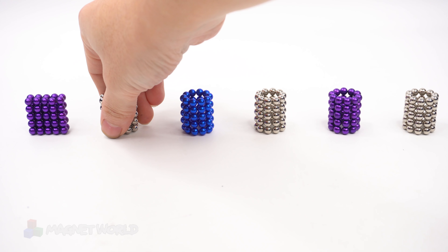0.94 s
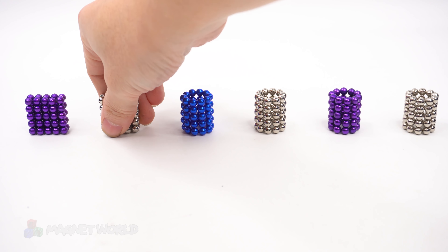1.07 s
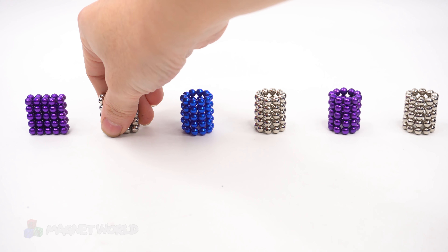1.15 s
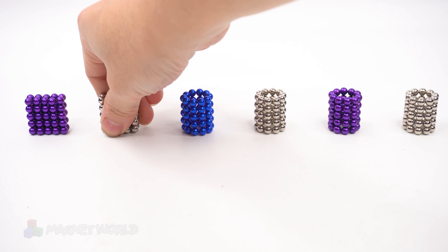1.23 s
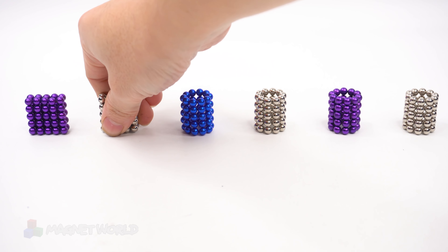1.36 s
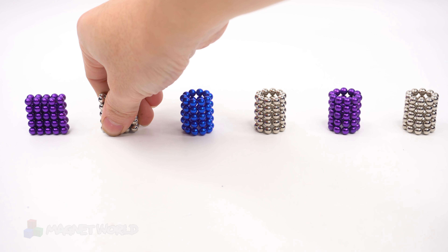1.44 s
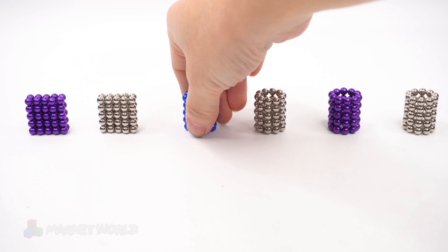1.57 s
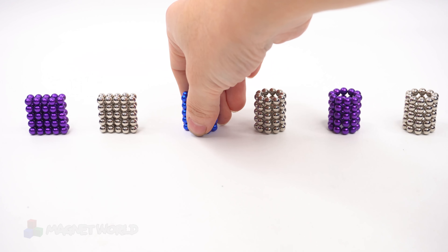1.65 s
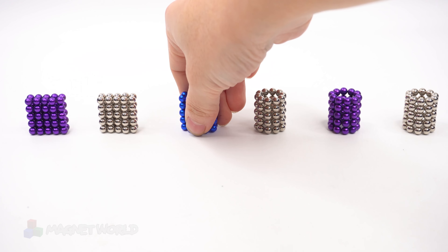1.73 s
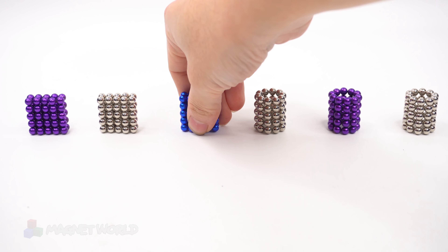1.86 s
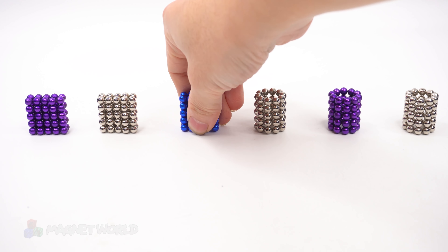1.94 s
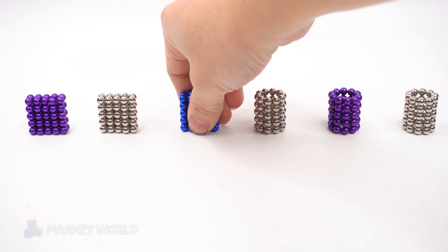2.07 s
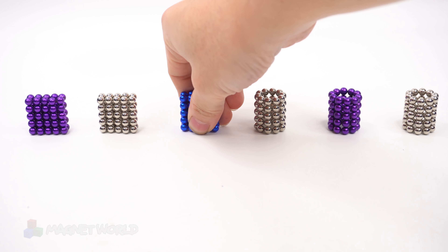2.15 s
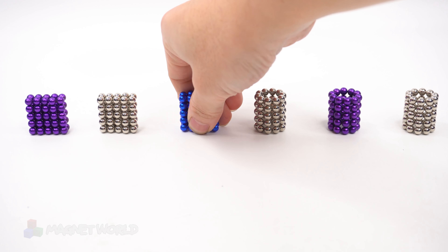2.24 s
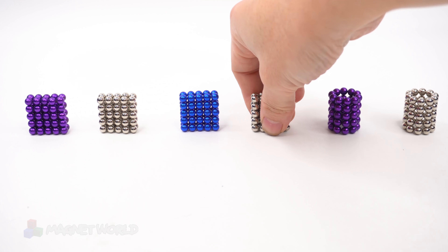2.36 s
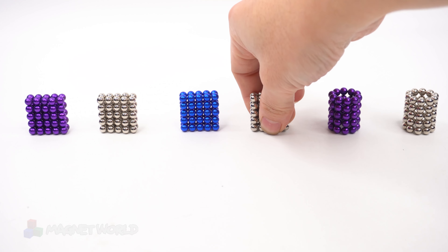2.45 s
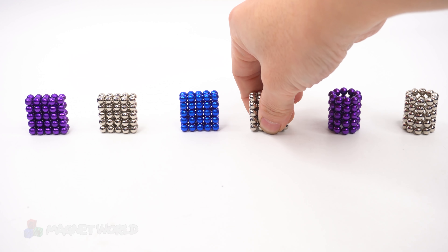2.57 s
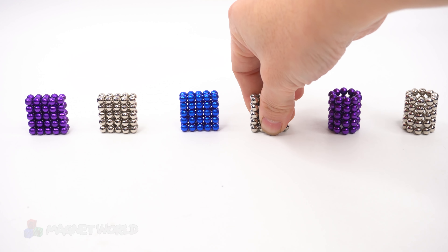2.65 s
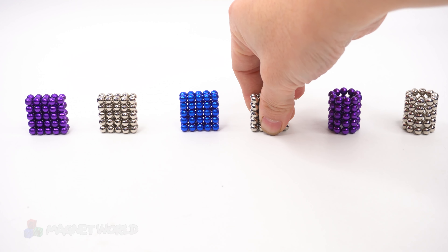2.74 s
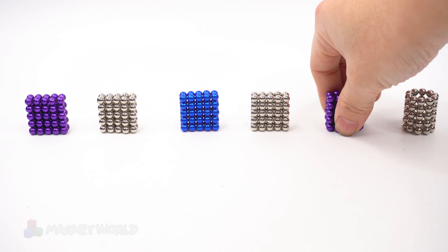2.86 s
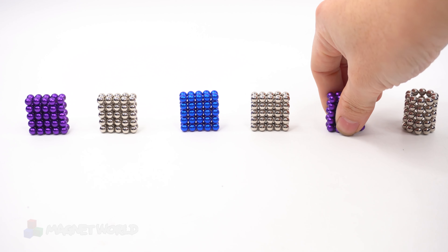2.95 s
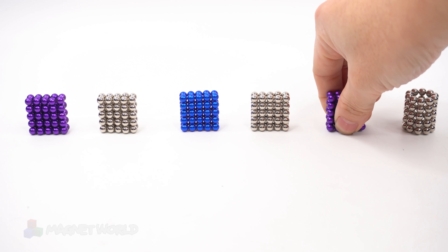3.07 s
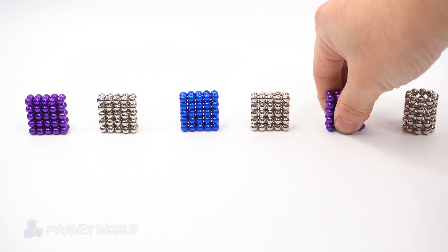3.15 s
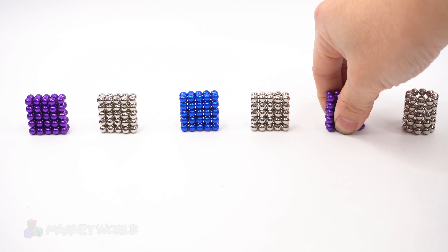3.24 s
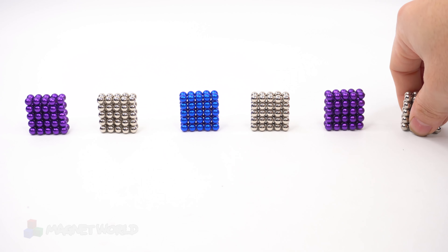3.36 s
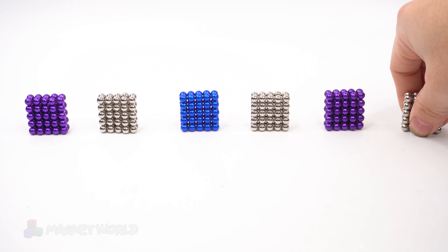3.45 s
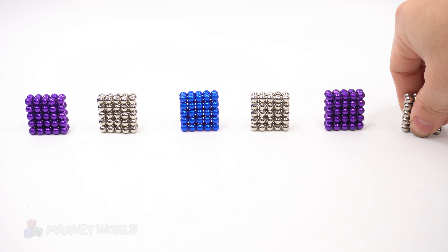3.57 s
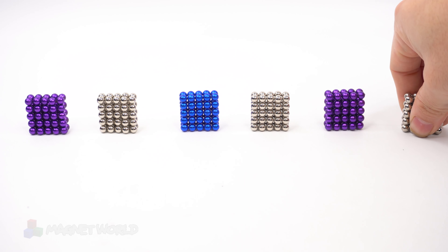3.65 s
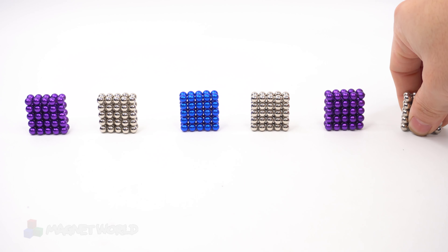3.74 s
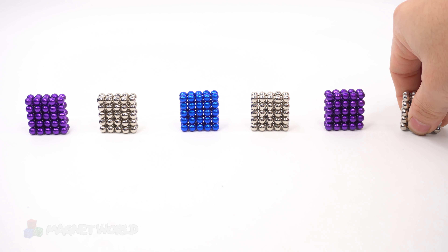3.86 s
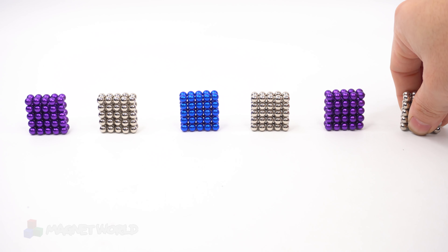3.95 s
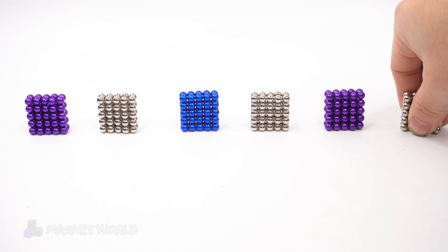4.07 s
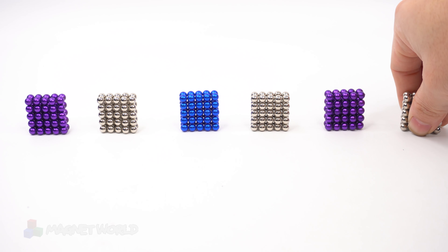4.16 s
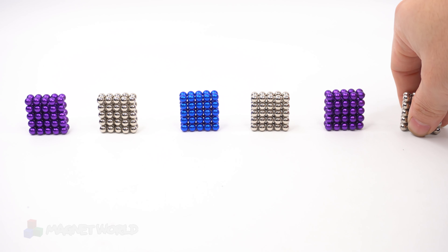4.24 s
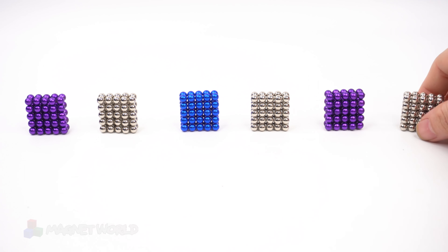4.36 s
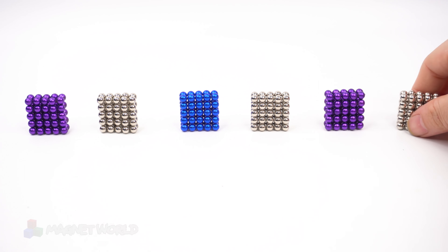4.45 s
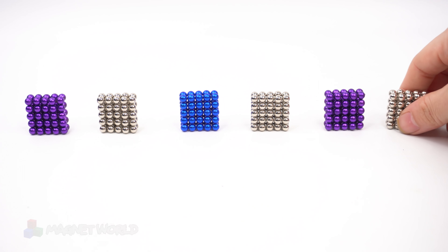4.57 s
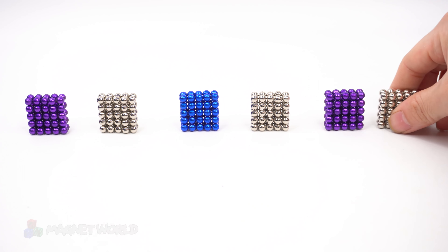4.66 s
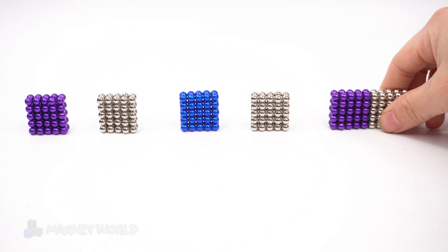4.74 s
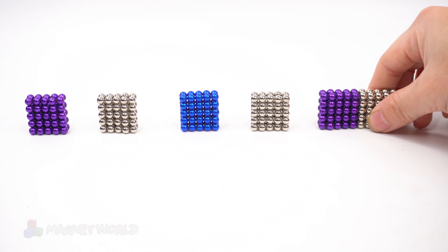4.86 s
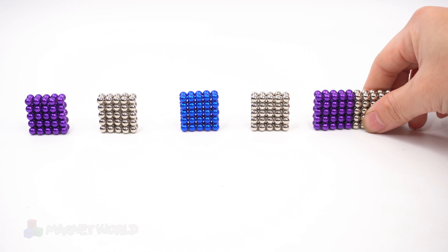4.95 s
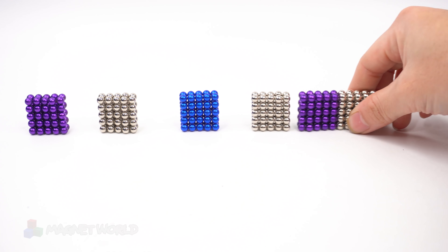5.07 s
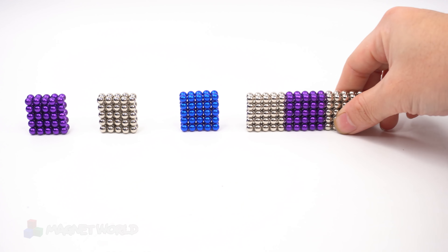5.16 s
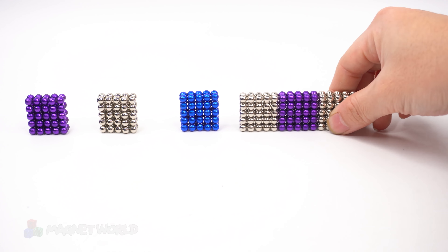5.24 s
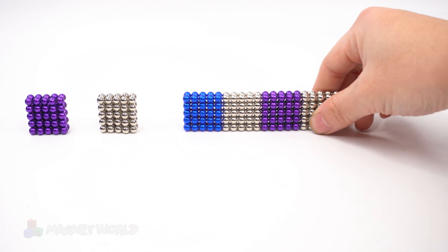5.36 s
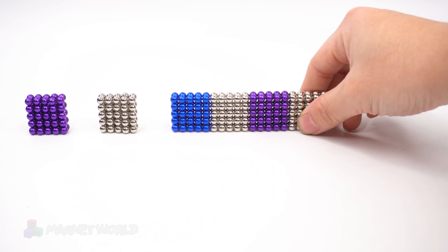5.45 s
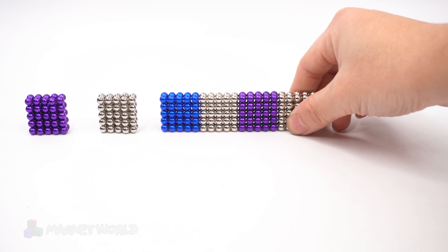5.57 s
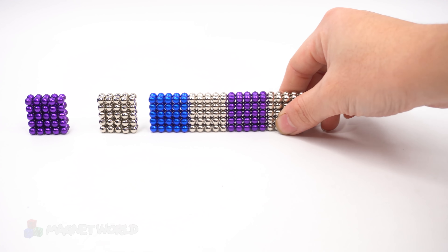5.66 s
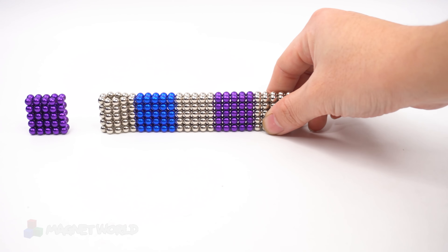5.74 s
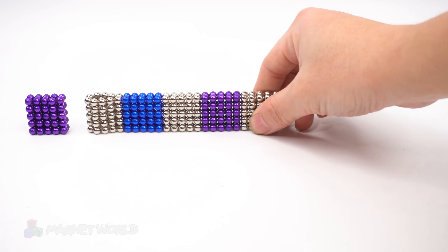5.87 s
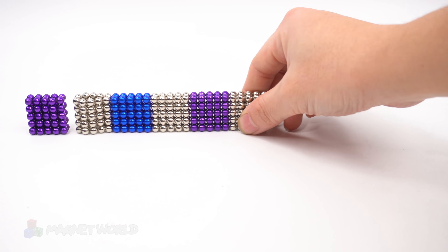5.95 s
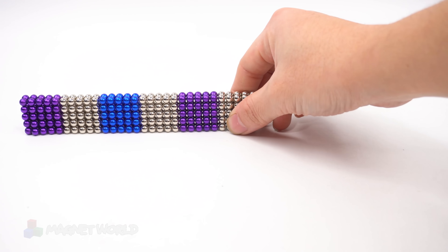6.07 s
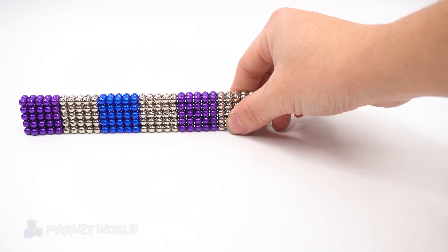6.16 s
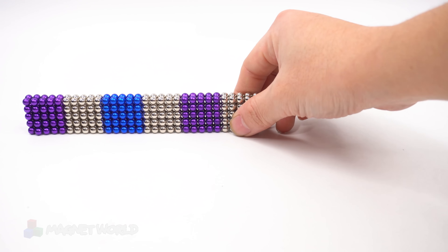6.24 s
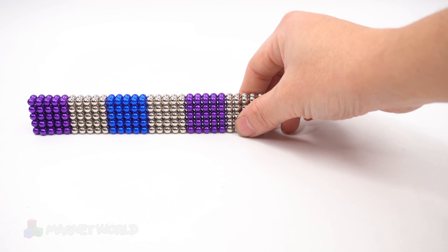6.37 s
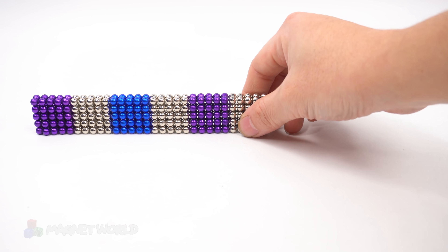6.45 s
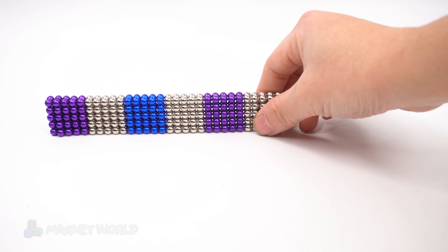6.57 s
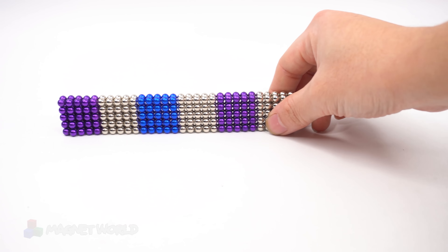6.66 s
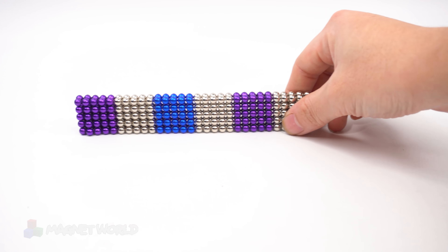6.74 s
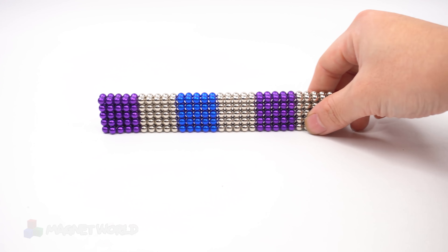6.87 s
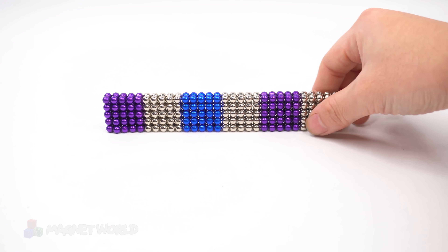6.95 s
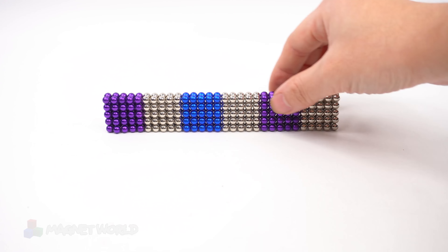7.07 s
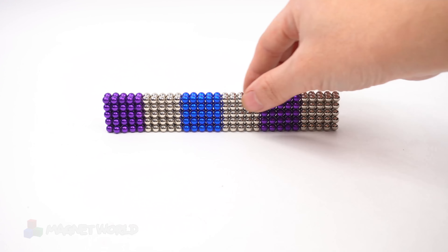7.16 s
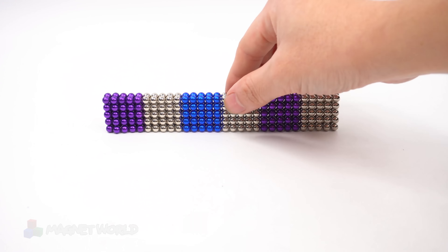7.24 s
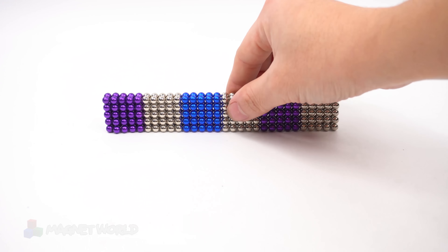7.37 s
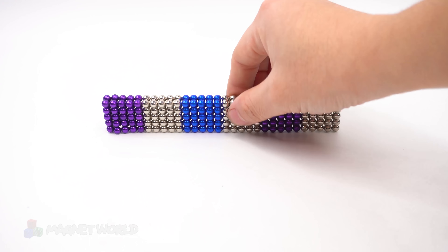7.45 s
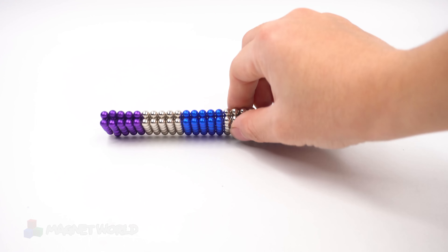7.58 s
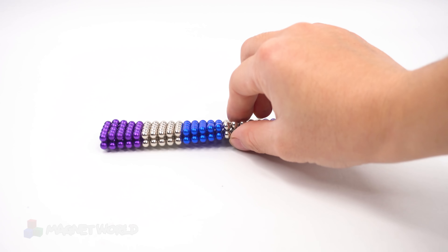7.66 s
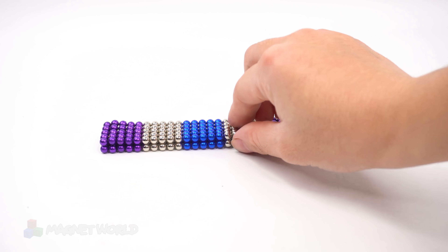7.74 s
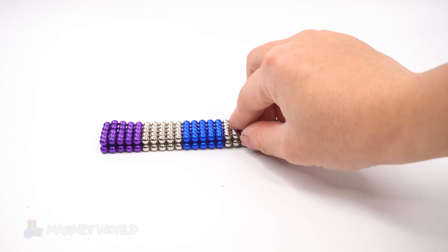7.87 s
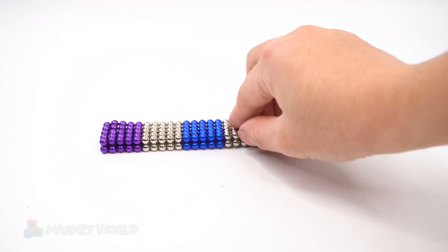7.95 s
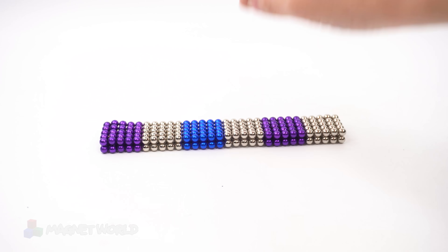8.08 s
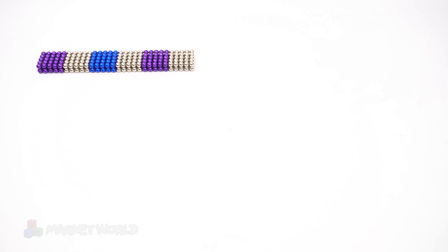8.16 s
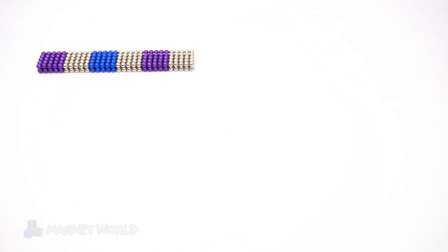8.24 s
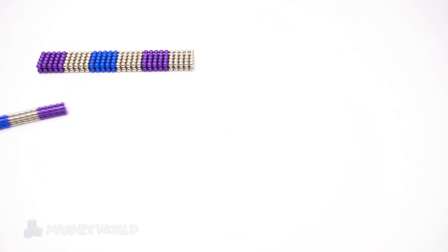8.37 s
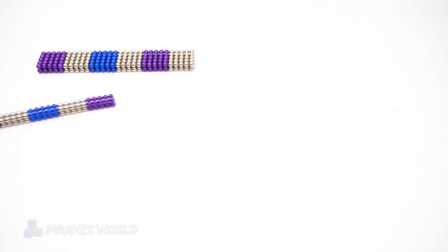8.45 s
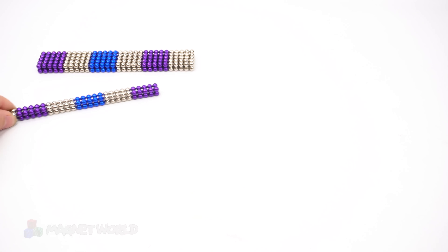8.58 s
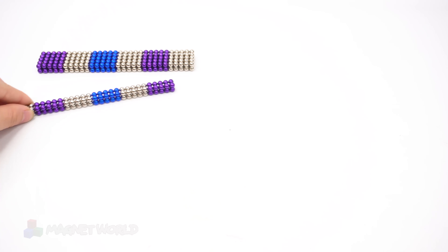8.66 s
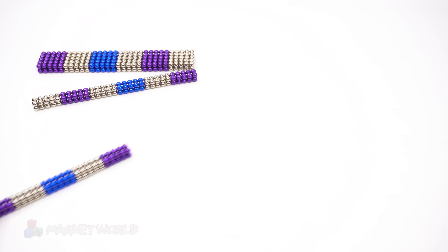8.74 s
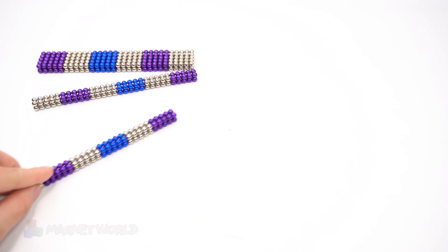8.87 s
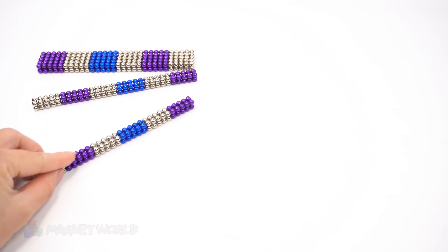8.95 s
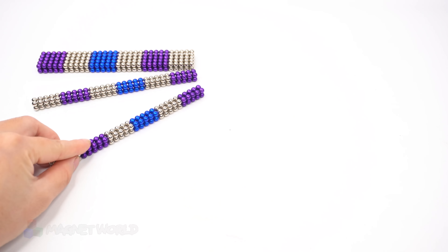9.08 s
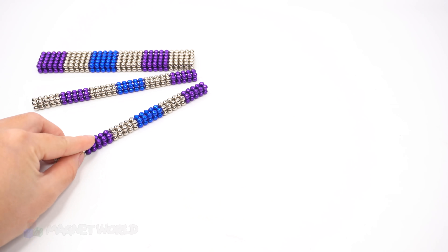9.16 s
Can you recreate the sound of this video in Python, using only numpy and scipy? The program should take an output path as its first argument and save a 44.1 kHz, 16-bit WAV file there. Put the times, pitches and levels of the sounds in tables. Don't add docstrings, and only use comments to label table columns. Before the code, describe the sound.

Tiny magnetic steel balls tick under fingers, then five loud metallic snaps join cubes in turn, followed by a scrape, a clack and skidding bars.

```python
import sys
import numpy as np
from scipy import signal
from scipy.io import wavfile

SR = 44100
rng = np.random.default_rng(int(sys.argv[2]) if len(sys.argv) > 2 else 0)


def boost(x):
    u = np.asarray(x, float) / 20
    return 10 ** u


def master(y):
    cut = np.clip(np.atleast_2d(y).T, -1, 1)
    pcm = np.round(cut * 32767)
    wavfile.write(sys.argv[1], SR, pcm.astype(np.int16))


N = 406161

# time in s, peak in dB, clack against top in dB,
# body against top in dB, left minus right in dB.
SNAPS = [
    (4.836, -4.5, -15, -5.5, 2.5),
    (5.202, -3.5, -23.5, -10, 1),
    (5.469, -7.5, -7, -13.5, 6.5),
    (5.809, -4, -0.5, -7.5, 3),
    (6.097, -8.5, -6, 0, 3.5),
    (7.832, -23.5, 7, 7, 12),
]


def rms_one(x):
    return x / np.sqrt(np.mean(x ** 2) + 1e-20)


def in_time(tables, fade_s):
    t, rows = np.arange(N) / SR, np.vstack(tables)
    gate = 0
    for rows_of_one in tables:
        inside_s = np.minimum(t - rows_of_one[0][0], rows_of_one[-1][0] - t)
        gate = gate + np.clip(inside_s / fade_s + 1, 0, 1)
    return [np.minimum(gate, 1)] + [np.interp(t, rows[:, 0], column) for column in rows.T[1:]]


def at_hz(points, hz):
    points = np.array(points)
    return np.interp(np.log(hz), np.log(points[:, 0]), points[:, 1])


def band(x, low_hz, high_hz):
    sections = signal.butter(2, [low_hz, min(high_hz, .45 * SR)], "band", fs=SR, output="sos")
    return signal.sosfilt(sections, x)


def resonate(x, hz, width_hz):
    r = np.exp(-np.pi * width_hz / SR)
    poles = [1, -2 * r * np.cos(2 * np.pi * hz / SR), r * r]
    return signal.lfilter([(1 - r * r) / 2, 0, (r * r - 1) / 2], poles, x)


def drift(rate):
    knots = rng.standard_normal(int(N / SR * rate) + 2)
    return np.interp(np.linspace(0, len(knots) - 1, N), np.arange(len(knots)), knots)


def grains(count, per_s, spread_db):
    moment, strength, sign = rng.random((3, count))
    size = boost(spread_db * np.minimum(-np.log(1 - strength), 3))
    return rms_one((moment < per_s / SR) * size * np.sign(sign - .5) + 1e-9)


def panned(x, pan_db):
    return x * boost(np.array([[.5], [-.5]]) * pan_db)


def add(out, s, x):
    i = round(s * SR)
    out[:, i:i + x.shape[1]] += x[:, :N - i]


def swells(rows):
    t = np.arange(N) / SR
    gain = 0
    for s, db, rise_s, fall_s in rows:
        gain = gain + boost(db - 10 * np.maximum((s - t) / rise_s, (t - s) / fall_s))
    return gain


def bank(source, gain_db, alike, lean_db):
    out, edges = 0, 14 * 2 ** (np.arange(22) / 2)
    for k, (low, high) in enumerate(zip(edges, edges[1:])):
        hz = np.sqrt(low * high)
        likeness = np.clip(alike(hz), -1, 1)
        mid, side = band(source[k % 2], low, high)
        pair = np.sqrt(1 + likeness) * mid + np.sqrt(1 - likeness) * side * [[1], [-1]]
        out = out + panned(boost(gain_db(hz)) * pair, lean_db(hz))
    return out


def shudder(rise_s, t60, linger_db):
    t = np.arange(16384) / SR
    force = rng.standard_normal(16384) + .4 * rng.standard_normal((2, 16384))
    decay = boost(-60 * t / t60) + boost(linger_db - 17 * t / t60)
    return force * (1 - np.exp(-(t / rise_s) ** 2)) * decay


def room_tone():
    # frequency in Hz, level in dB.
    air_spectrum = [(8.8, -30), (15, -1), (35, -4), (59, -23.5), (142, -20), (201, -32), (247, -26.5),
                    (303, -15), (330, -28.5), (455, -31.5), (705, -37.5), (917, -42), (1260, -43),
                    (1460, -44), (16000, -56.5)]
    # frequency in Hz, left-right likeness from 0 to 1.
    air_likeness = [(60, 0.63), (240, 0.12), (950, 0.36), (3770, 0.38), (15000, 0.69)]
    # frequency in Hz, left minus right in dB.
    air_lean = [(60, 0), (180, 7), (550, 2), (1650, -1.5), (4970, 1), (15000, 0.0)]
    # frequency in Hz, level in dB rms.
    hum_lines = [(301.5, -73), (452.2, -74), (904.4, -82.5), (1061, -88), (1513, -87), (1663, -113),
                 (2116, -91.5)]
    together = drift(3.)

    def gain_db(hz):
        return at_hz(air_spectrum, hz) + .6 * together + 1.0 * drift(3.6)

    air = bank(rng.standard_normal((2, 2, N)), gain_db,
               lambda hz: at_hz(air_likeness, hz), lambda hz: at_hz(air_lean, hz))
    hum = 0
    for hz, db in hum_lines:
        hum = hum + boost(db + 4.5) * np.sin(2 * np.pi * (hz * np.arange(N) / SR + rng.random()))
    return boost(-49.5) * rms_one(air) + panned(hum, 2.7)


def room(x):
    # frequency in Hz, reverberation time in s.
    reverb_times = [(150, 0.8), (600, 0.13), (2000, 0.32), (6000, .26), (14000, .21)]
    t, tail = np.arange(16384) / SR, 0
    for hz in 100 * 2. ** np.arange(8):
        decay = boost(-60 * t / at_hz(reverb_times, hz)) * np.clip((t - .004) / 0.0058, 0, 1)
        tail = tail + band(rng.standard_normal((2, 16384)), hz / np.sqrt(2), hz * np.sqrt(2)) * decay
    tail = tail / np.sqrt(np.sum(tail ** 2) / 2)
    return signal.fftconvolve(x, tail, axes=1)[:, :N]


def table_top(force):
    # frequency in Hz, width in Hz, level in dB.
    top_modes = [(85, 27, -12.5), (172, 30, -10.5), (262.7, 16, 0.5), (335, 26, -0.5), (388.2, 31, -2),
                 (439, 68, -10), (577, 41, -8.5), (700, 90, -18.5), (860, 360, -20.5)]
    return sum((-1) ** k * boost(db) * resonate(force, hz, w) for k, (hz, w, db) in enumerate(top_modes))


def struck(hz, t60, rise_s):
    t = np.arange(16384) / SR
    wave = np.sin(2 * np.pi * (hz * t + rng.random()))
    return (1 - np.exp(-(t / rise_s) ** 2)) * boost(-60 * t / t60) * wave


def knocks():
    # time in s, peak in dB, frequency in Hz, decay time t60 in s, upper modes in dB.
    blows = [(0.541, -51.5, 183, 0.24, 1.5), (0.77, -44, 134, 0.18, -4.5), (1.186, -32, 122, 0.18, -18.5),
             (1.973, -55.5, 131, 0.18, 9.5), (2.116, -48.5, 111, 0.33, -23),
             (2.414, -38.5, 136.6, 0.23, -14.5), (2.996, -39.5, 125, 0.21, -18),
             (3.162, -36.5, 170.4, 0.12, -17.5), (3.481, -38, 153.5, 0.3, -17.5),
             (4.846, -22.5, 140.3, 0.15, -12.5), (5.206, -18.5, 148, 0.14, -6),
             (5.476, -26.5, 147.6, 0.2, -5.5), (5.816, -19, 164.6, 0.15, -6),
             (6.096, -30.5, 153.2, 0.19, 5.5), (7.836, -17.5, 157, 0.15, -9)]
    out = np.zeros((2, N))
    for s, peak_db, hz, t60, upper_db in blows:
        ring = struck(hz, t60, .005) + .3 * struck(hz * .62, t60 * 1.5, 0.017)
        upper = boost(upper_db + 22.5) * table_top(shudder(0.0048, t60 * .7, -42))
        add(out, s, panned(boost(peak_db + 5.0) * (ring + upper), 8.5))
    return out


def creaks():
    # time of top in s, level in dB, rise in s per 10 dB, fall in s per 10 dB.
    handling = [(0.7, -58.5, 0.5, 0.74), (1.33, -56, .5, 0.03), (1.97, -58, .5, .5), (2.46, -56, .2, 0.25),
                (3.13, -56.5, 0.2, .25), (4.8, -63.5, .35, 0.64), (5.41, -52.5, 0.14, 0.37),
                (6.1, -52.5, 0.2, .25), (6.8, -51.5, .16, 0.1), (7.45, -69, .6, 1), (7.85, -58, 0.2, 0.2),
                (8.72, -56, 0.25, 0.3), (9.08, -58.5, .3, 4)]
    creak = band(rng.standard_normal(N) + .4 * rng.standard_normal((2, N)), 70, 220)
    return panned(boost(-2.0) * swells(handling) * rms_one(creak), 6.5)


def rocking():
    # start in s, end in s, level at the end in dB.
    spells = [
        (1.213, 1.315, -30),
        (3.037, 3.06, -45),
        (6.2, 6.306, -36),
    ]
    attack_db_per_s, growth_db_per_s, release_db_per_s = 450, 45, 600
    rock_hz, sag_hz, settle_s = 72.5, 7.4, 0.064
    start_s, end_s, end_db = np.transpose(spells)[:, :, None]
    since, left = np.arange(N) / SR - start_s, end_s - np.arange(N) / SR
    level_db = (end_db - growth_db_per_s * left + attack_db_per_s * np.minimum(since, 0)
                + release_db_per_s * np.minimum(left, 0))
    hz = rock_hz - sag_hz * np.exp(-(since / settle_s) ** 2).sum(axis=0)
    return panned(boost(level_db + 4.5).sum(axis=0) * np.sin(2 * np.pi * np.cumsum(hz) / SR), 7.0)


def table():
    out = knocks() + creaks() + rocking()
    lag = round(.0007 * SR)
    return np.array([np.pad(out[0], (lag, 0))[:N], out[1]])


def contacts(events, spread_s, late_db, late_s, per_s, gains_db, edges_hz, top_width_hz):
    out, t = np.zeros((2, N)), np.arange(4096) / SR
    swell = np.minimum(t / 0.0005, 1) * (np.exp(-t / spread_s) + boost(late_db) * np.exp(-t / late_s))
    low_hz, mid_hz, high_hz, top_hz = edges_hz
    top_gain_db, clack_gain_db, body_gain_db = gains_db
    for s, peak_db, clack_db, body_db, pan_db in events:
        hits = grains(count=4096, per_s=per_s, spread_db=7.5)
        burst = swell * (hits + 0.4 * rng.standard_normal((2, 4096)))
        top = resonate(resonate(burst, top_hz, top_width_hz), top_hz, top_width_hz)
        clack = boost(clack_db + clack_gain_db) * band(burst, mid_hz, high_hz)
        body = boost(body_db + body_gain_db) * band(burst, low_hz, mid_hz)
        mix = boost(top_gain_db) * top + clack + body
        add(out, s - .0005, panned(boost(peak_db) * mix, pan_db))
    return out


def bar_rings(events, t60, gain_db, pan_db):
    out = np.zeros((2, N))
    for s, peak_db, low_hz, high_hz, high_db in events:
        force = shudder(0.002, t60 * 0.62, -19)
        low = resonate(force, low_hz, 170) + 0.18 * band(force, 900, 4700)
        high = boost(high_db + 1.5) * resonate(shudder(.0007, t60 * .3, -36.5), high_hz, 700)
        add(out, s, panned(boost(peak_db + gain_db) * (low + high), pan_db))
    return out


def finger_ticks():
    # time in s, peak in dB, clack against top in dB, body against top in dB.
    tick_events = [(0.5435, -58, 12, -26), (0.6066, -73, 1, 17), (0.634, -60.5, 8, -2), (0.7663, -52, 7, 6),
                   (1.0123, -77, 11, 18.5), (1.174, -27.5, -7, -14.5), (1.2536, -36, -30, -39),
                   (1.4478, -34, -12, -17), (1.979, -64.5, 26.5, 23), (2.12, -72, 11.5, 12),
                   (2.4056, -26.5, -29, -29), (2.5477, -41, -15, -28), (2.745, -36, -12.5, -19),
                   (2.9877, -51, 11.5, -5), (3.0591, -57, 12.5, 7.5), (3.1643, -59, 7.5, 0),
                   (3.4779, -30, -23.5, -41.5), (3.55, -44, -10, -30), (3.6048, -38.5, -10, -15.5),
                   (3.8392, -46.5, -21, -21), (3.8812, -61, -2, -15)]
    return contacts([(*row, 8.5) for row in tick_events], spread_s=0.00082, late_db=-13, late_s=0.0096,
                    per_s=12000, gains_db=(14., 6., 8.), edges_hz=(800, 5000, 13000, 15000), top_width_hz=5030)


def cube_rings():
    # time in s, peak in dB, low ring in Hz, high ring in Hz, high ring in dB.
    cube_events = [(0.545, -39.5, 1490, 6300, 2), (0.633, -48.5, 818, 4980, 4), (0.767, -43, 2200, 4210, 9),
                   (1.979, -40, 1970, 4440, 2.5), (2.405, -42.5, 1170, 6840, -7.5),
                   (2.744, -48.5, 953, 6680, -19), (2.989, -45.5, 1930, 3970, 2),
                   (3.056, -57.5, 1090, 4570, 16), (3.478, -41, 1800, 3600, -25)]
    return bar_rings(cube_events, .05, 11.7, 6.3)


def skid():
    # time in s, level in dB, dulling by loss of speed in dB.
    slides = [
        [(8.2295, -23, 6), (8.288, -17.5, 5), (8.322, -21, 0.5), (8.376, -20.5, -0.5), (8.406, -25, 0),
         (8.556, -25.5, 15), (8.594, -30, 20), (8.734, -43.5, 30.5), (8.811, -50.5, 37)],
        [(8.814, -30.5, -0.5), (8.847, -23, 2.5), (8.953, -27, 4.5), (9.015, -28.5, 13.5), (9.067, -36.5, 21),
         (9.107, -46, 16.5), (9.143, -53.5, 32), (9.21, -58, 32.5)],
    ]
    # ring frequency in Hz, width in Hz, level in dB.
    slide_rings = [
        [(980, 96, -8.5), (1170, 21, -6), (1454, 140, -6.5), (1870, 45, -2), (2880, 60, -3.5), (3570, 57, -7.5), (4380, 76, -9.5), (6170, 42, -6.5), (7110, 160, -15)] + [(6040, 350, -0.5)],
        [(897, 90, -7), (1490, 48, 0.5), (1585, 13, -6), (1842, 99, -4), (2866, 56, -2.5), (3590, 65, -3), (4060, 42, -11), (4400, 120, -6), (5020, 42, -25.5)],
    ]
    # frequency in Hz, density in dB per Hz.
    slide_colour = [(120, -65.5), (200, -38), (259, -25.5), (659, -5.5), (899, -5), (1480, -1.5),
                    (3970, -4), (6050, -11), (6880, -16), (13300, -6.5), (16000, -12)]
    # frequency in Hz, added left minus right in dB.
    slide_lean = [(300, -0.5), (700, 7), (1300, -6), (2400, -3), (5000, 3), (15000, -1)]
    gate, level_db, slowed_db = in_time(slides, 0.0015)
    second = np.arange(N) / SR > slides[0][-1][0]
    clack_db = -slowed_db
    top_db = second * -9 - slowed_db - 2.5 * np.maximum(slowed_db - 14, 0)
    low_db = -23 + second * 7 + 1.15 * slowed_db
    pan_db = 6.5 + 0.1958 * slowed_db
    chatter = np.reshape(grains(count=4 * N, per_s=7000, spread_db=3.5), (2, 2, N))
    ringing = np.zeros_like(chatter)
    for rows, rings in zip(slides, slide_rings):
        start = round((rows[0][0] - .005) * SR)
        ringing[..., start:] = sum(boost(db) * resonate(chatter[..., start:], hz, w) for hz, w, db in rings)

    def gain_db(hz):
        octave = np.log2(hz / 2000)
        dull_db = np.clip(octave, 0, 1) * (clack_db + 1)
        dull_db = dull_db + np.clip(octave - 1.6, 0, 1) * (top_db - clack_db + 2)
        deep_db = np.clip(-octave - 1.1, 0, 1) * (low_db + 11)
        return at_hz(slide_colour, hz) + dull_db + deep_db + 2.1 * drift(30.)

    sound = bank(chatter + 3.4 * ringing, gain_db,
                 lambda hz: .85 if hz < 2000 else .65, lambda hz: at_hz(slide_lean, hz))
    sound = sound / np.std(band(sound, 610, 2620))
    out = gate * panned(boost(level_db - 1.5) * sound, pan_db)
    add(out, 8.98, boost(-33) * resonate(shudder(.05, 0.55, -58.5), 4400, 60))
    return out


def drag():
    # time in s, force as rumble in dB.
    pull_force = [(6.5, -69), (6.574, -57), (6.648, -42.5), (6.804, -36), (6.94, -30), (7.008, -35.5),
                  (7.084, -67.5), (7.15, -76.5)]
    # time of top in s, level in dB, rise in s per 10 dB, fall in s per 10 dB.
    jolts = [(4.7, -64, 0.45, .4), (4.86, -43, 0.03, 0.03), (5.225, -33, 0.0461, 0.03),
             (5.5, -30.5, 0.0266, .07), (5.61, -40, .1, .05), (5.84, -34, 0.08, 0.05),
             (6.13, -35.5, 0.0648, 0.03), (6.42, -51, 0.03, 0.03)]
    creeps = [(4.49, -68, .07, 0.25), (4.88, -70, .1, 0.17), (5.3, -72, 0.03, 0.3), (5.84, -73, .1, .2),
              (6.18, -68, 0.07, 0.15), (6.93, -45.5, 0.0327, 0.013)]
    # frequency in Hz, density in dB per Hz.
    scratch_colour = [(410, -30.5), (700, -7), (1340, -8), (1580, -9), (2080, -10), (2420, -8),
                      (14000, -48)]
    gate, force_db = in_time([pull_force], .03)
    slips = grains(count=N, per_s=900, spread_db=4.5) + 0.65 * rng.standard_normal((2, N))
    rumble = rms_one(band(table_top(slips), 150, 630))
    rumble = rumble * boost(1.0 * drift(25.)) * (swells(jolts) + gate * boost(force_db))
    hiss = rng.standard_normal((2, 2, N))
    hiss = hiss + 1.5 * resonate(hiss, 1950, 230)
    scratch = rms_one(bank(hiss, lambda hz: at_hz(scratch_colour, hz), lambda hz: .8, lambda hz: 6.))
    pulled = gate * boost(-49.5 + 1.75 * (force_db - force_db.max()))
    return panned(rumble, 9.8) + scratch * boost(1.2 * drift(11.0)) * (swells(creeps) + pulled)


def settling():
    out = np.zeros((2, N))
    for s, *_, pan_db in SNAPS:
        add(out, s, panned(boost(-39) * band(shudder(.006, .24, -60), 4500, 12000), pan_db))
    return out


def bar():
    # time in s, peak in dB, low ring in Hz, high ring in Hz, high ring in dB.
    shocks = [(4.8354, -6.5, 1870, 4650, -5.5), (5.2014, -16.5, 2002, 6900, 3.5),
              (5.4704, -21, 1950, 2880, 2.5), (5.8104, -14, 2074, 5190, -1.5),
              (6.101, -11.5, 2083, 5060, -14), (7.8327, -8, 1490, 6170, 0)]
    further_rings = [(4.838, -10.5, 1497, 5680, -3.5), (5.202, -19, 1100, 3580, -1),
                     (5.470, -23, 1000, 8000, 11), (5.809, -19.5, 1200, 3350, 6.5),
                     (6.099, -19, 1166, 2290, 2.5), (7.834, -12, 2150, 4000, -3)]
    edge_taps = [
        (6.309, -61, 1490, 4536, -3.5),
        (7.816, -35.5, 1478, 3000, -17),
        (7.827, -27.5, 1461, 3180, -9.5),
    ]
    out = np.zeros((2, N))
    for rows, t60 in [(shocks, 0.089), (further_rings, .08), (edge_taps, .05)]:
        out += bar_rings(rows, t60, 14.72, 1.4)
    return out


def snaps():
    return contacts(SNAPS, spread_s=.0038, late_db=-18, late_s=0.013, per_s=16000,
                    gains_db=(8.5, 6.5, 3.5), edges_hz=(800, 3000, 9000, 13400), top_width_hz=4800)


def scene():
    near = table() + finger_ticks() + cube_rings() + skid() + drag() + bar() + snaps()
    return near + settling() + boost(-25.5) * room(near) + room_tone()


def roll_off(x):
    return signal.sosfilt(signal.butter(12, 16480, fs=SR, output="sos"), x)


def record(dry):
    x = dry - .35 * resonate(dry, 12500, 2200) + .3 * resonate(dry, 15200, 1500)
    x = signal.sosfilt(signal.cheby2(16, 60, 16200, fs=SR, output="sos"), x)
    return roll_off(np.clip(x, -1, 1))


dry = scene()
out = record(dry)
master(out)
```